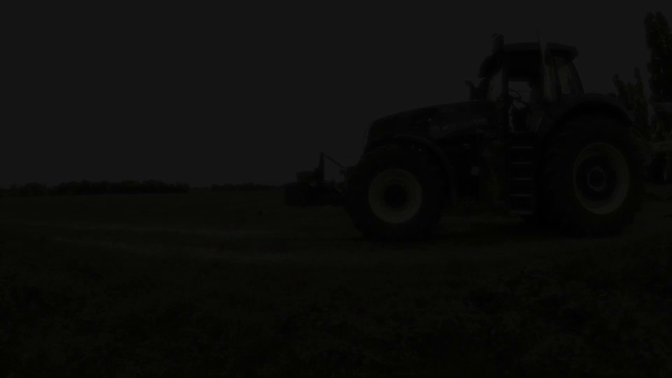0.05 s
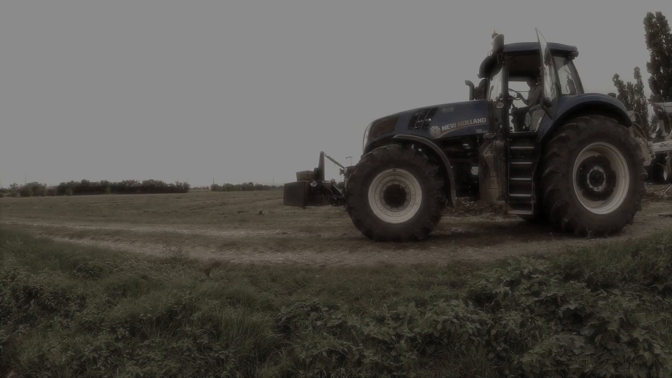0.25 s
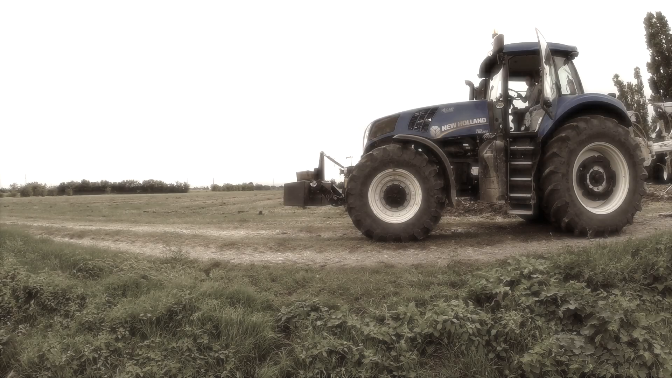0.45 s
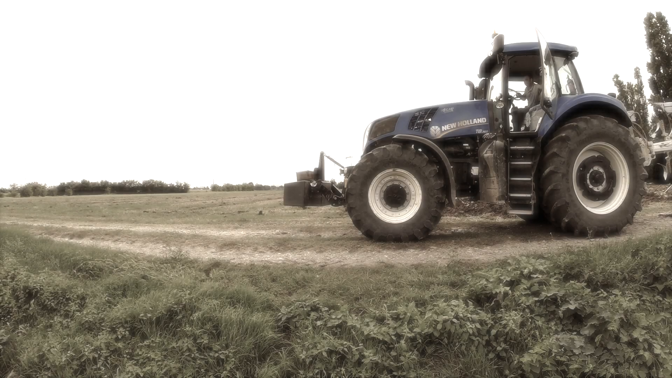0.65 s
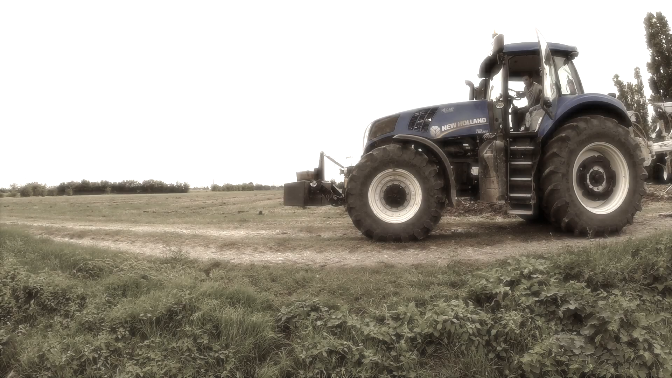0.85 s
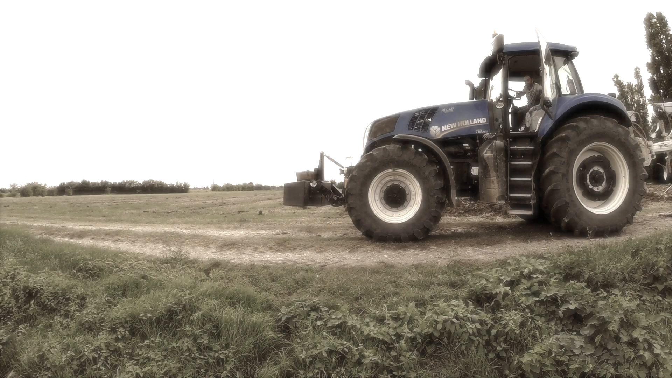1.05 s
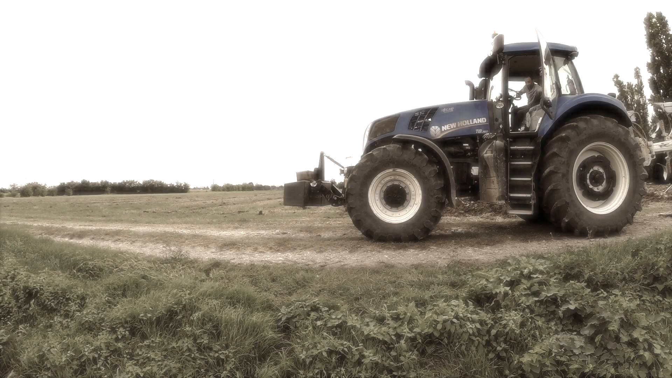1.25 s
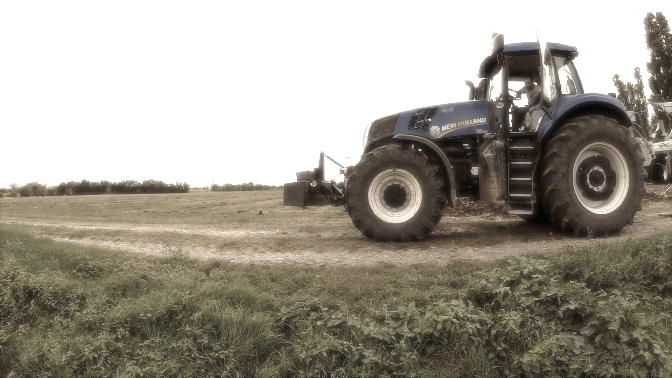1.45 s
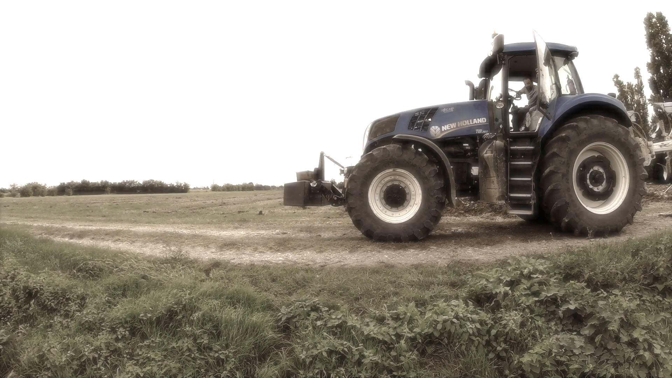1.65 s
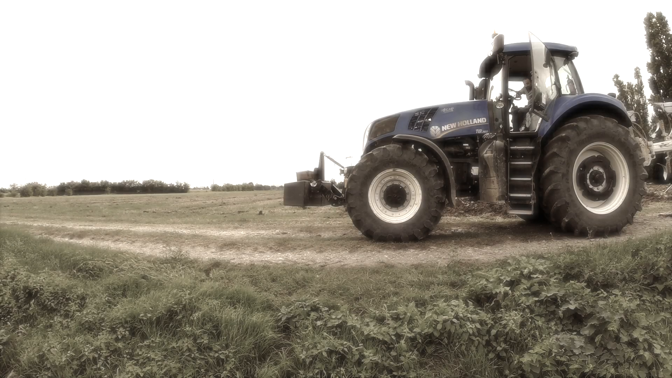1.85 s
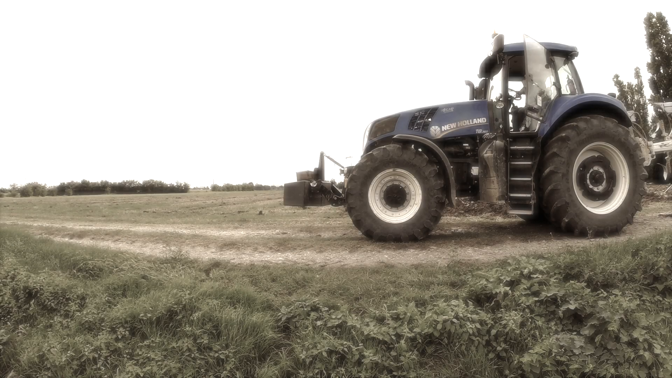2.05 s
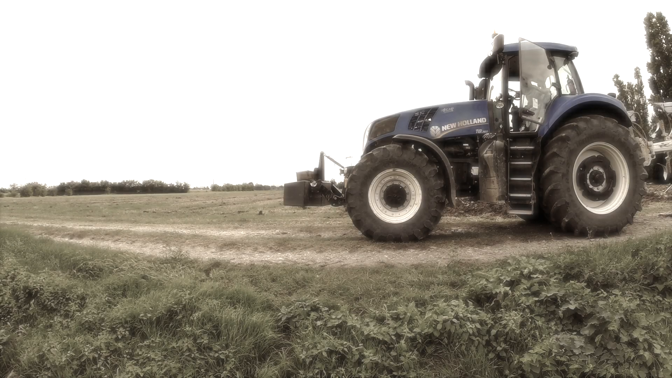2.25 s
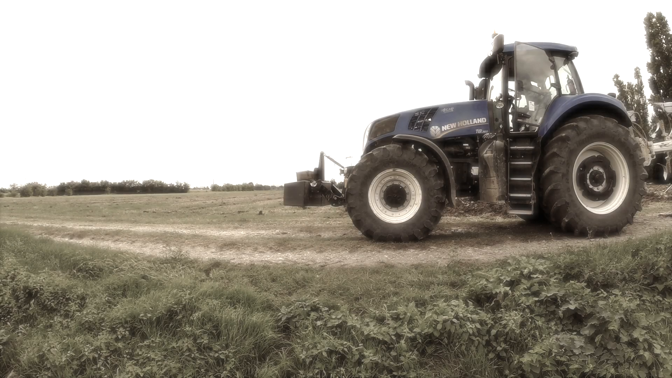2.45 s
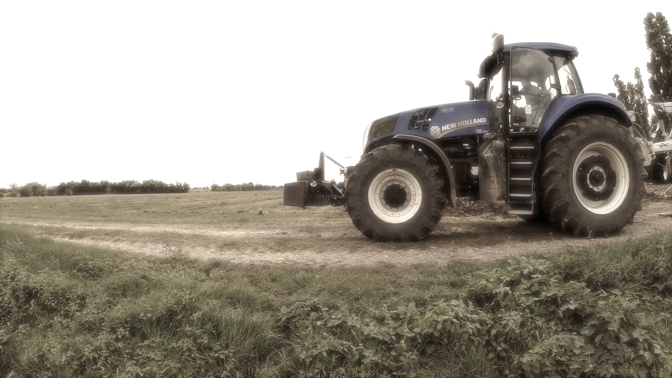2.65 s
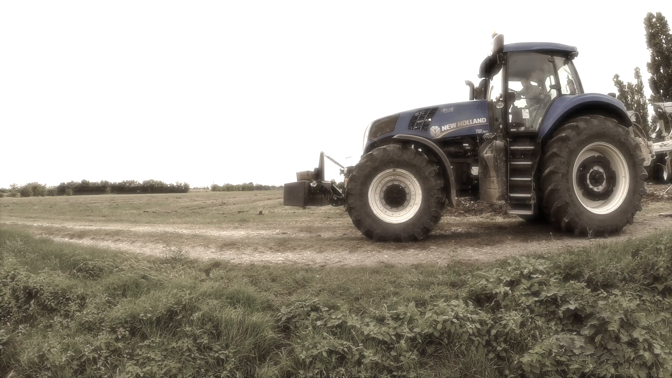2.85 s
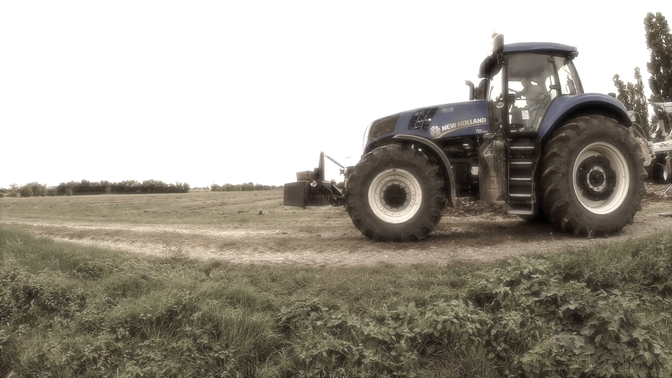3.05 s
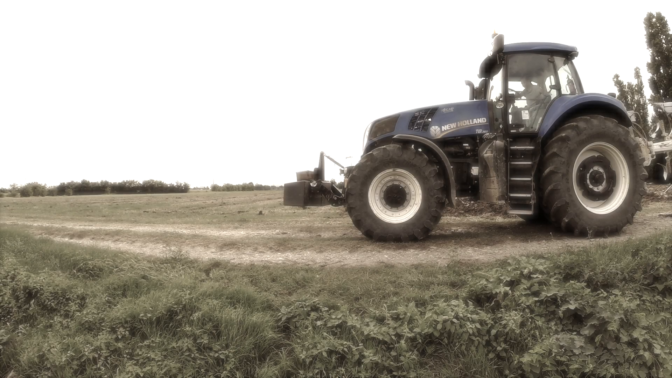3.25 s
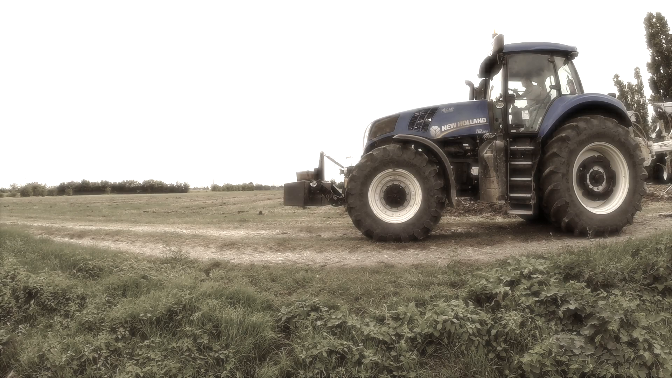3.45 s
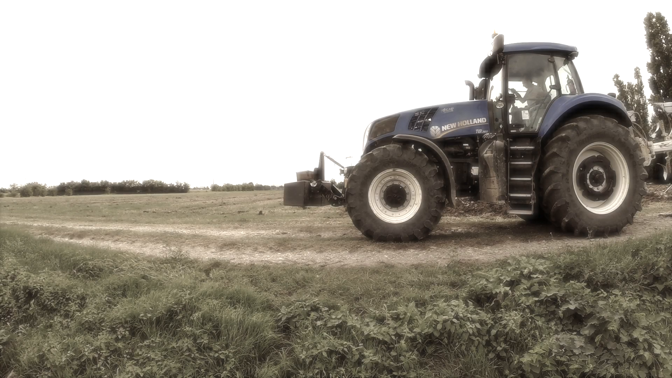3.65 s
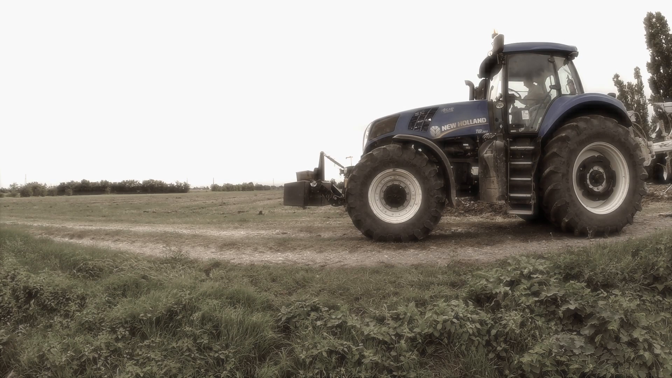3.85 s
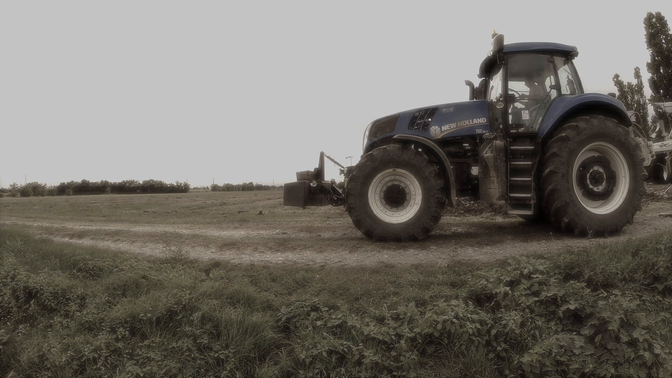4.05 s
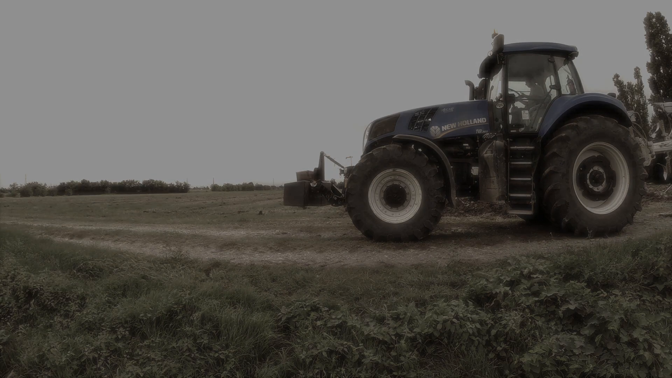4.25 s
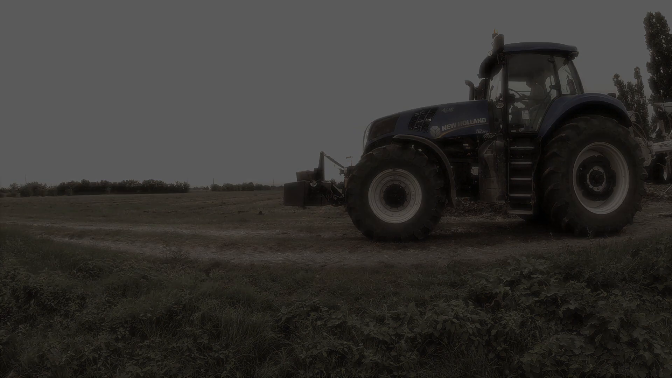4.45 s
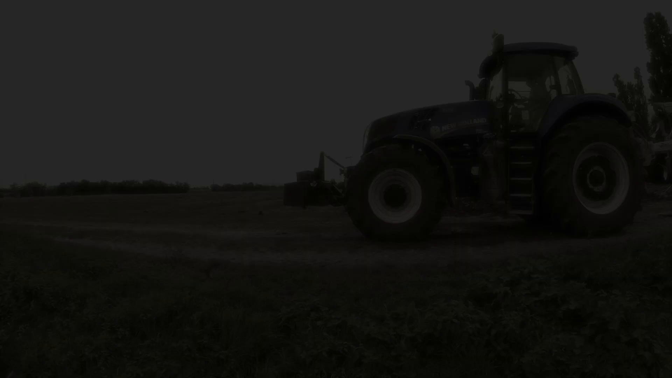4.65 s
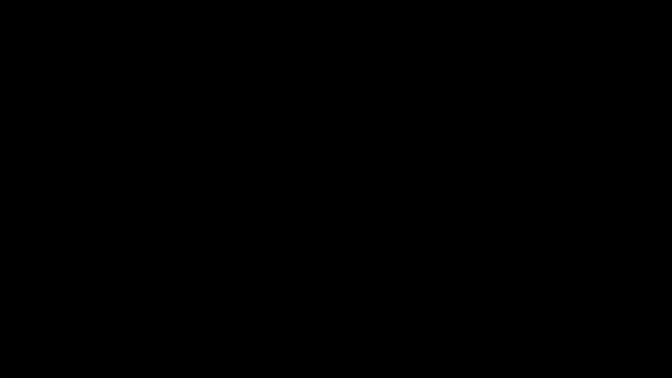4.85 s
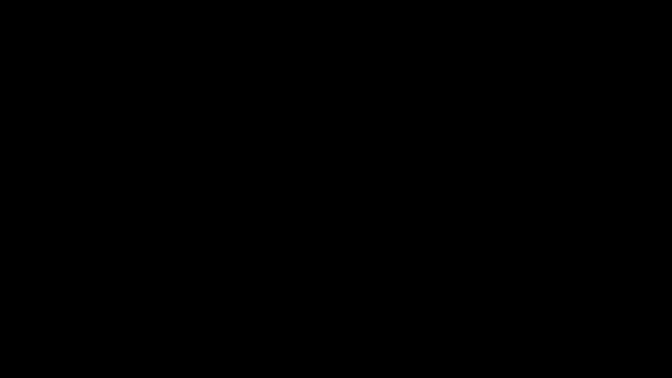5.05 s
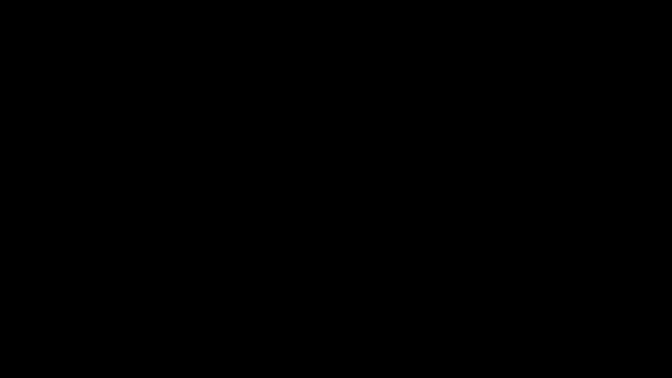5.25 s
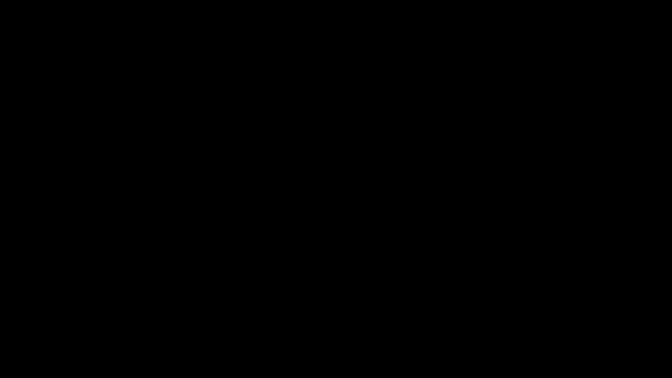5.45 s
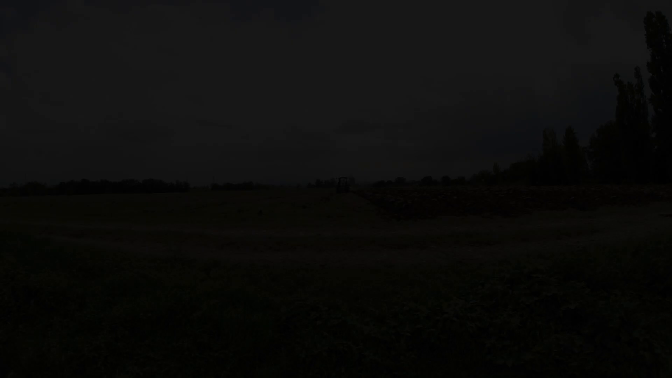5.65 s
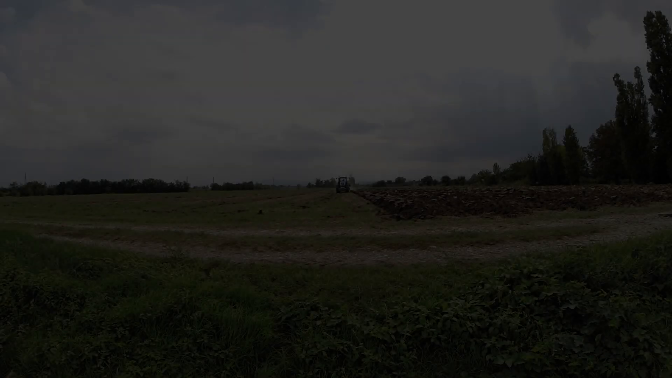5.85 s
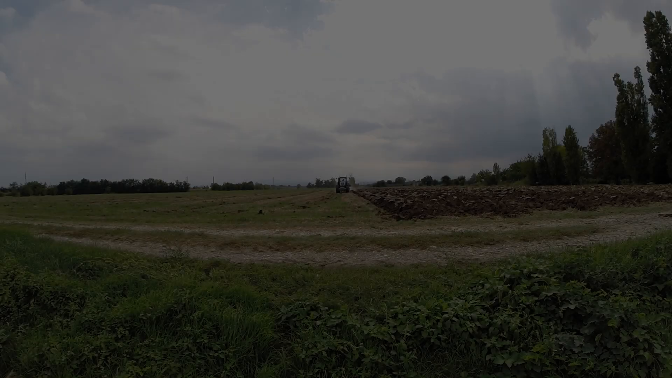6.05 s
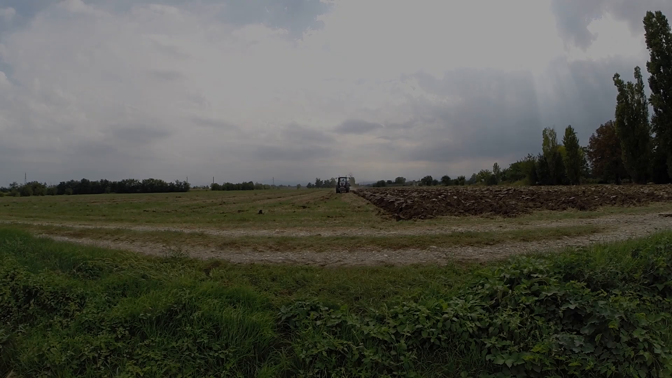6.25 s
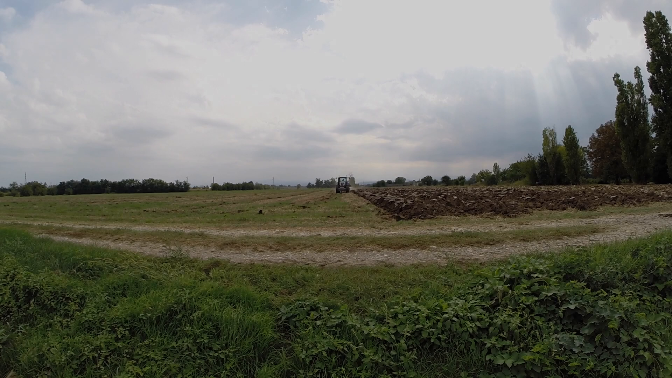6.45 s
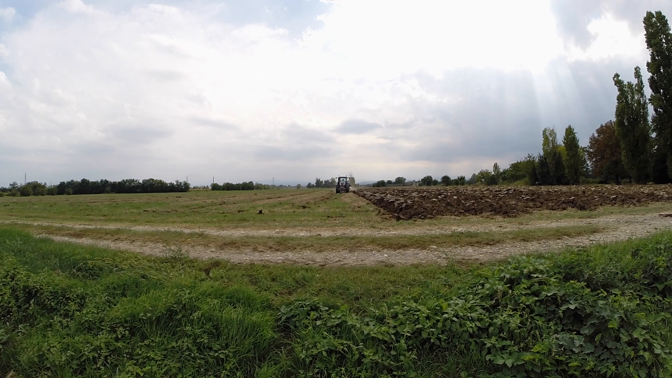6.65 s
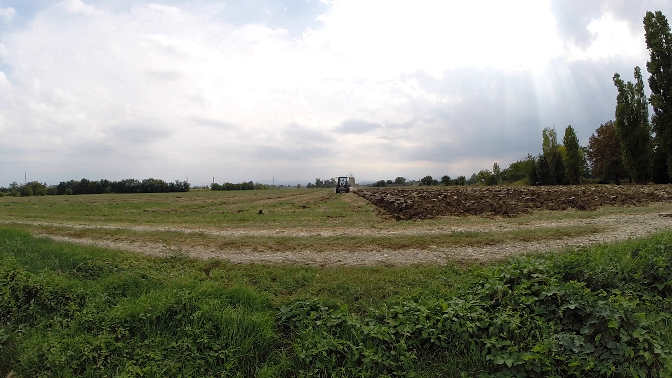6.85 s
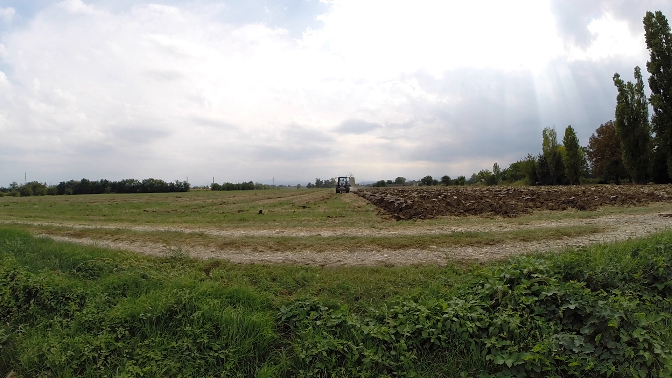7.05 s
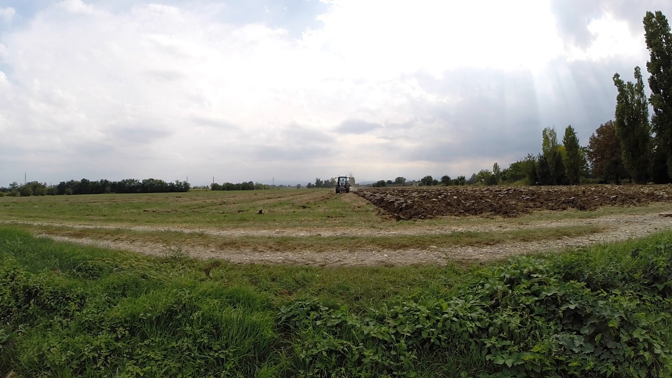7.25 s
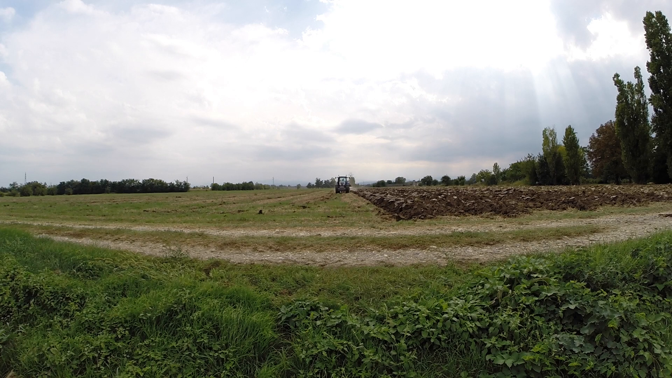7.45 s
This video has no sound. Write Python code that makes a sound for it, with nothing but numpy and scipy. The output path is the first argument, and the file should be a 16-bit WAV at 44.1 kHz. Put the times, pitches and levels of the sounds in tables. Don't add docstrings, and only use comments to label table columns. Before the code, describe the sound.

A large diesel tractor idles close by with fan roar and clatter, its cab door slams hard, then it fades into distant, quieter engine work.

```python
import sys
import numpy as np
from scipy import signal
from scipy.fft import rfft, irfft, next_fast_len
from scipy.io import wavfile
from scipy.ndimage import uniform_filter1d

SR = 44100
rng = np.random.default_rng(int(sys.argv[2]) if len(sys.argv) > 2 else 0)


def gain_from_decibels(decibels):
    exponent = np.asarray(decibels, float) / 20
    return 10 ** exponent


def wav_out(sig):
    wavfile.write(sys.argv[1], SR, np.round(np.clip(np.atleast_2d(sig).T, -1, 1) * 32767).astype(np.int16))


N = 331191
T = np.arange(N) / SR
CROSS_FROM_S, CROSS_TO_S = 4.26, 6.414


def standing():
    # freq_hz, level_db_per_hz
    fan_roar = [(8.8, -33), (15, -11.5), (99, -4), (134, -5), (172, -7), (274, -1), (332, -10),
                (414, -10.5), (559, -11.5), (677, -12.5), (1140, -18.5), (1500, -20), (2330, -25.5),
                (4610, -38), (10500, -52), (13600, -86), (22000, -120)]
    # freq_hz, width_hz, gain_db
    resonances = [(178, 32, -1), (243, 20, 1.5), (273, 158, 2.5), (345, 36, -2), (410, 74, 3.5), (512, 61, 4),
                  (550, 34, -4.5), (660, 89, 2), (876, 46, 5), (920, 31, -0.5), (1395, 310, 1), (1990, 48, 2),
                  (2126, 39, 4.5),
                  (3320, 150, 2), (4660, 300, 6), (4980, 200, -3), (5480, 350, 6), (5900, 300, -3),
              (6680, 350, 4), (7140, 120, 4), (7600, 500, -2), (9500, 400, 3)]
    order = np.array([2, 4, 5, 7, 11, 32, 43.5, 88, 96, 99, 112, 294, 306, 310])
    order_db = [-13, -17, -19, -19, -21, -19, -24, -28, -24, -31, -31, -44, -46, -46]
    blade_db = [
        -9.5,
        -11,
        -17,
    ]
    # start_s, odd_harmonic_db, even_harmonic_db
    blade_load = [(0, 1, -4), (.7, 1, -1), (1.0, 4, 0), (1.25, -5, 0), (1.6, 2.5, 0), (1.8, 1, -8),
                  (2.05, -3, 4), (2.3, -1, 3.5), (2.5, 2.5, 1.5), (2.75, -2.5, 6), (3.15, -2, -8),
                  (3.45, 4.5, 3), (3.8, 0.5, 1), (4.15, 0, 1), (4.5, 0, -5), (5.0, -1.5, 0), (5.5, -2.5, 1),
                  (6.4, -4, 2)]
    cycle_hz, blade_hz = 15.21, 138.3
    level_db, fade_in_s, fade_in_power = -20, 0.51, 1.42

    cycle = np.cumsum(cycle_hz * (1 + 0.000397 * walk(2.05))) / SR
    roar = colour(grainy(60, 1.4, 0.012), fan_roar, resonances)
    roar = patchy(roar, [450, 800, 1300, 1900, 2800, 4200, 6000], 8, 0.79)

    treble = band(roar, 1500, 12000)
    beat = 1 + .07 * np.cos(2 * np.pi * 2 * cycle) + .05 * np.cos(2 * np.pi * 16 * cycle)
    strokes = np.cos(2 * np.pi * 8 * cycle) + .5 * np.cos(2 * np.pi * 32 * cycle)
    pump = 0.27 * strokes * band(roar, 4200, 5800)
    clatter = gain_from_decibels(0.44 + 0.27 * walk(11)) * (beat * treble + pump)

    shaft = np.zeros(N)
    for multiple, db in zip(order, order_db):
        strength = np.sqrt(2) * gain_from_decibels(db + 2.95 * walk(15))
        shaft += strength * np.sin(2 * np.pi * (multiple * cycle + rng.random()))

    load = np.transpose(blade_load)
    blades = np.zeros(N)
    for k, db in enumerate(blade_db):
        load_db = np.interp(T, load[0], load[1 + k % 2])
        blades += tone((k + 1) * blade_hz, db + load_db, wobble_db=2.3, drift=.009, rate=14)

    fade_in = np.minimum(T / fade_in_s + 0.075, 1) ** fade_in_power
    gain = gain_from_decibels(level_db) * fade_in * (1 - crossed()) * ducking()
    return gain * (gain_from_decibels(1.0) * (roar - treble + clatter) + shaft + blades)


def door():
    bounce_db = [-1, -2, 0, -2, -4, -14]
    # centre_hz, level_db, decay_s, loss_db_per_bounce
    door_parts = [
        (1550, -23.5, 0.0089, 0.),
        (2200, -32, 0.006, 0.),
        (2930, -30.5, 0.0082, .5),
        (3800, -23, .008, 1.5),
        (5300, -31.5, 0.009, 2),
        (8700, -39, 0.0073, .2),
        (6700, -39, .008, 4),
        (800, -29, 0.015, 2.5),
    ]
    # start_s, freq_hz, level_db, t60_s
    panel = [
        (3.0203, 278, -7, .14),
        (3.003, 400, -20, .08),
        (3.021, 620, -22, .04),
        (3.02, 90, -15, .15),
        (3.05, 130, -20, .2),
        (3.045, 62, -17, .3),
    ]
    # start_s, freq_hz, level_db, t60_s
    latch = [(2.998, 1620, -29, .04), (2.998, 2090, -22, 0.03), (2.998, 3580, -25, 0.02),
             (2.998, 4330, -29, .025), (2.999, 5350, -28.5, .04), (3.002, 6900, -29, .02),
             (3.002, 2350, -26, .03), (3.006, 1344, -16.5, 0.037), (3.006, 3600, -28, 0.023),
             (3.010, 1820, -15, .03), (3.010, 2200, -23, 0.048), (3.010, 2770, -35, .05),
             (3.014, 4170, -21, 0.021), (3.014, 3600, -21, .025), (3.015, 9000, -38, .015),
             (3.018, 2060, -18.5, 0.033), (3.018, 930, -24, 0.031), (3.022, 1260, -19, .05),
             (3.026, 1770, -20.5, 0.024), (3.026, 3620, -29.5, 0.024), (3.026, 8700, -32, .012),
             (3.031, 920, -24, .04), (3.034, 2060, -19, .025), (3.034, 1280, -28, 0.037),
             (3.042, 1700, -29, .03)]
    slam_s, bounce_s = 2.998, .0086
    squeeze_s, squeeze_hz, squeeze_size, squeeze_width_s = 3.0235, 26, .44, .018
    crest_s, crest_size, crest_width_s = 3.0215, .5, .0017
    rebound_s, rebound_share = .06, .36

    bounces = []
    for k, hit_db in enumerate(bounce_db):
        for hz, db, decay_s, lost_db in door_parts:
            bounces.append((slam_s + k * bounce_s, hit_db + db - k * lost_db, hz, decay_s))
    out = rattles(bounces, 1.22, .08)

    out = out + crest_size * bell(crest_s, crest_width_s)
    for k in range(3):
        s = squeeze_s + k * rebound_s
        swing = bell(s, squeeze_width_s) * np.cos(2 * np.pi * squeeze_hz * (T - s))
        out = out + squeeze_size * rebound_share ** k * swing

    for s, hz, db, t60_s in panel + latch:
        age_s = np.maximum(T - s, 0)
        out = out + gain_from_decibels(db) * np.exp(-np.log(1000) * age_s / t60_s) * np.sin(2 * np.pi * hz * age_s)
    return out


def clanks():
    # start_s, level_db, centre_hz, decay_s
    loose_parts = [(.585, -33, 860, .01), (2.36, -47, 1680, 0.013), (2.445, -26, 1300, 0.021),
                   (2.755, -20, 900, .01), (2.945, -20, 890, .01), (3.647, -22, 880, 0.012),
                   (3.747, -24, 730, 0.0068), (3.82, -29.5, 1980, 0.022), (4.568, -20, 706, 0.007),
                   (4.676, -28, 2060, .015), (4.876, -24, 800, 0.0097), (4.929, -30, 704, .008)]
    return rattles(loose_parts, 1.1, .03)


def working():
    # freq_hz, level_db_per_hz
    far_roar = [(8.8, -61), (20, -11), (65, -13), (130, -13), (200, -8), (260, -15), (500, -16), (900, -20),
                (1600, -21.5), (3150, -27), (7000, -40.5), (11300, -53), (13000, -59), (16000, -72)]
    # freq_hz, width_hz, gain_db
    ground = [(170, 65, 4.5), (508, 85, -8), (860, 220, 5), (1190, 140, -7), (1460, 310, 5),
              (1790, 230, -8.5), (2200, 220, -3), (2530, 170, -3), (3120, 210, 0.5), (4100, 250, -1),
              (4250, 150, 1.5), (6850, 200, -8), (7080, 200, 0), (7360, 250, -2), (8300, 350, -6),
              (8750, 300, 0.5), (9050, 150, -3), (9500, 300, -3), (11000, 1200, 3)]
    # freq_hz, level_db
    far_lines = [(210.5, -11), (350, -22), (409, -27), (829, -25), (858, -26), (1014, -29), (1295, -30),
                 (1528, -27), (1590, -30), (2083, -33), (2239, -31), (2320, -32), (2842, -36), (2998, -34),
                 (3200, -33), (3435, -37), (4274, -37), (4577, -39), (5130, -43), (5631, -45), (6099, -41),
                 (7052, -49), (8742, -56), (9286, -56)]
    # start_s, rate_hz
    firing = [
        (4, 99),
        (6.4, 98.5),
        (6.9, 95),
        (7.51, 95),
    ]
    # multiple_of_firing_rate, level_db
    firing_orders = [
        (1, -8),
        (5 / 3, -18),
        (2, -8),
    ]
    # start_s, pitch_hz
    gear = [
        (4, 1080),
        (6.6, 1078),
        (7.51, 1035),
    ]
    # start_s, pitch_hz
    turbo_pitch = [
        (4.15, 10700),
        (4.7, 10910),
        (5.5, 10870),
        (5.85, 10760),
        (5.97, 10880),
        (6.35, 10870),
        (6.75, 10685),
        (7.51, 10635),
    ]
    level_db, approach_db_per_s = -35, 1.9
    turbo_db, turbo_swell_db = -36, 1.2

    roar = colour(grainy(60, 1.5, 0.004), far_roar, ground)
    roar = patchy(roar, [700, 1150, 1800, 2600, 3900, 6000, 8000], 5, 1.)
    roar = patchy(roar, [11500, 12300, 13000, 13700, 14400], 25, 2.5, first=1)

    lines = sum(tone(hz, db, wobble_db=2.5, drift=0.004) for hz, db in far_lines)
    firing_hz = np.interp(T, *np.transpose(firing))
    lines = lines + sum(tone(k * firing_hz, db, wobble_db=.8, drift=.001) for k, db in firing_orders)
    lines = lines + tone(np.interp(T, *np.transpose(gear)), -25, wobble_db=3.)

    flutter = unit(band(rng.standard_normal(N), 10, 130)) + 1.
    turbo_hz = np.interp(T, *np.transpose(turbo_pitch))
    whistle = tone(turbo_hz, 0, wobble_db=-2.5, drift=.002, rate=24)
    turbo = gain_from_decibels(turbo_db + turbo_swell_db * walk(4.6)) * flutter * whistle

    gain = gain_from_decibels(level_db + approach_db_per_s * (T - CROSS_TO_S)) * crossed() * ducking()
    return gain * (gain_from_decibels(-3.5) * roar + lines + turbo)


def wind():
    # start_s, level_db, width_s
    puffs = [
        (5.56, -27, 0.023),
        (5.65, -27.5, 0.024),
        (5.802, -21, 0.0073),
        (5.932, -26, 0.015),
        (6.088, -35, 0.034),
        (6.18, -41, 0.033),
        (7.46, -35, 0.036),
    ]
    out = np.zeros(N)
    for s, db, width_s in puffs:
        out += gain_from_decibels(db) * bell(s, width_s) * unit(band(rng.standard_normal(N), 49, 109))
    return out


def insect():
    # start_s, length_s, from_hz, to_hz, level_db
    chirps = [
        (7.255, .03, 11800, 13000, -80),
        (7.25, .04, 14000, 15000, -78),
        (7.32, .04, 13000, 14500, -76),
        (7.36, .07, 14700, 15200, -75),
        (7.445, .035, 15150, 15150, -72),
    ]
    out = np.zeros(N)
    for s, length_s, from_hz, to_hz, db in chirps:
        part = np.clip((T - s) / length_s, 0, 1)
        turns = np.cumsum(from_hz + (to_hz - from_hz) * part) / SR
        out = out + gain_from_decibels(db) * np.sin(np.pi * part) * np.sin(2 * np.pi * turns)
    return out


def crossed():
    return np.clip((T - CROSS_FROM_S) / (CROSS_TO_S - CROSS_FROM_S), 0, 1)


def ducking():
    # start_s, depth_db
    ducks = [
        (3.03, 5.5),
        (5.8, 1.5),
    ]
    attack_s, release_s = 0.053, 0.17
    depth_db = np.zeros(N)
    for s, db in ducks:
        age_s = np.maximum(T - s, 0)
        depth_db += db * (1 - np.exp(-age_s / attack_s)) * np.exp(-age_s / release_s)
    return gain_from_decibels(-depth_db)


def rattles(hits, spread, wide):
    out, age_s = np.zeros(N), T[:SR // 8]
    for s, db, hz, decay_s in hits:
        noise, i = rng.standard_normal(len(age_s)), int(s * SR)
        burst = unit(band(noise, hz / spread, hz * spread)) + wide * unit(band(noise, 700, 9000))
        out[i:i + len(age_s)] += gain_from_decibels(db) * np.exp(-age_s / decay_s) * burst
    return out


def tone(hz, db, wobble_db=2., drift=0.00093, rate=6):
    turns = np.cumsum(hz * (1 + drift * walk(rate))) / SR + rng.random()
    return np.sqrt(2) * gain_from_decibels(db + wobble_db * walk(rate)) * np.sin(2 * np.pi * turns)


def grainy(rate_hz, spread_db, tail_s):
    knocks = (rng.random(N) < rate_hz / SR) * gain_from_decibels(spread_db * rng.standard_normal(N))
    tails = signal.lfilter([1], [1, -np.exp(-1 / (tail_s * SR))], knocks)
    return rng.standard_normal(N) * (1 + 0.13 * tails)


def patchy(x, edges_hz, rate, spread_db, first=0):
    size = next_fast_len(N, True)
    spectrum = rfft(x, size)
    part = np.digitize(np.arange(size // 2 + 1) * SR / size, edges_hz)
    out = np.zeros(N)
    for k in range(len(edges_hz) + 1):
        swell = gain_from_decibels(spread_db * (k >= first) * walk(rate))
        out += swell * irfft(spectrum * (part == k), size)[:N]
    return out


def colour(x, points, modes):
    size = next_fast_len(N, True)
    hz = np.maximum(np.arange(size // 2 + 1) * SR / size, 1)
    point_hz, point_db = np.transpose(points)
    db = np.interp(np.log(hz), np.log(point_hz), point_db)
    db = db + sum(d / (1 + (2 * (hz - f) / w) ** 2) for f, w, d in modes)
    return unit(irfft(rfft(x, size) * gain_from_decibels(db), size)[:N])


def walk(rate):
    k = max(int(SR / 64 / rate), 1)
    coarse = np.repeat(rng.standard_normal(N // 64 // k + 2), k)
    coarse = uniform_filter1d(uniform_filter1d(coarse, k), k)
    return unit(np.interp(np.arange(N) / 64, np.arange(len(coarse)), coarse))


def bell(s, width_s):
    return np.exp(-.5 * ((T - s) / width_s) ** 2)


def band(x, lo_hz, hi_hz):
    sos = signal.butter(2, [lo_hz, min(hi_hz, .45 * SR)], "band", fs=SR, output="sos")
    return signal.sosfilt(sos, x)


def unit(x):
    return x / np.sqrt(np.mean(x ** 2))


def scene():
    near_limit = signal.ellip(10, .1, 70, 10250, fs=SR, output="sos")
    near = signal.sosfiltfilt(near_limit, standing() + door() + clanks())
    return (near + working() + wind() + insect())[None]


def top_cut(x):
    return signal.sosfilt(signal.butter(12, 15270, fs=SR, output="sos"), x)


def record(dry):
    return top_cut(np.clip(dry, -1, 1))


dry = scene()
out = record(dry)
wav_out(out)
```